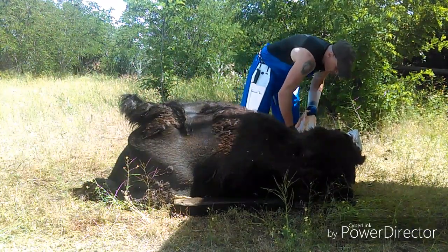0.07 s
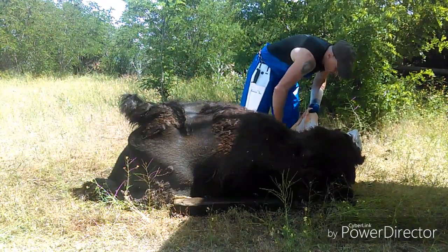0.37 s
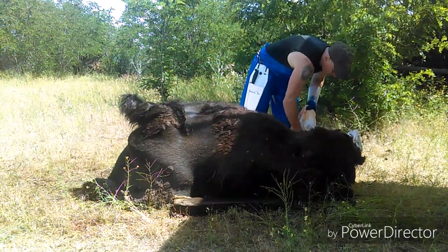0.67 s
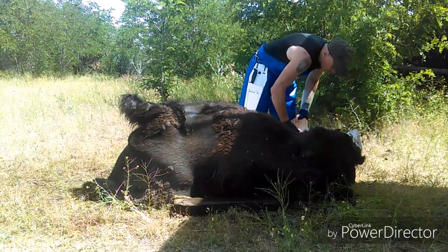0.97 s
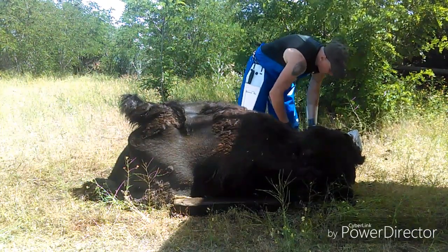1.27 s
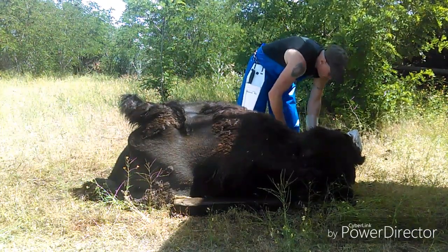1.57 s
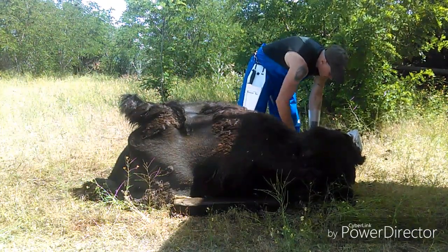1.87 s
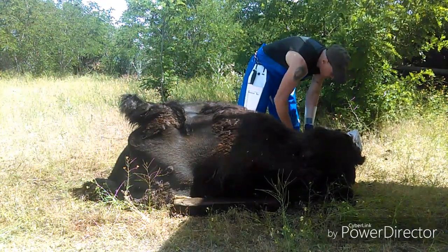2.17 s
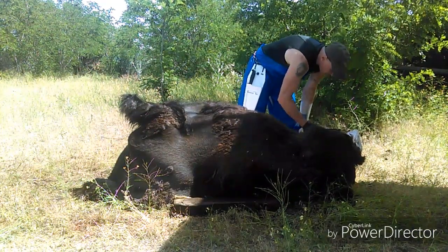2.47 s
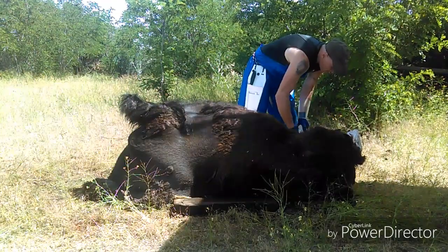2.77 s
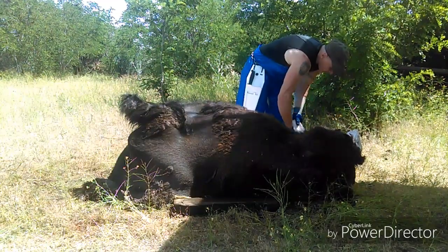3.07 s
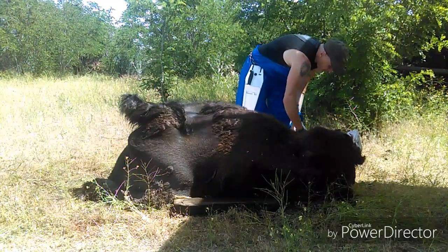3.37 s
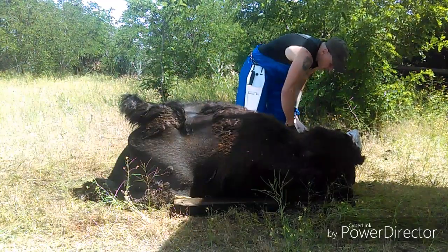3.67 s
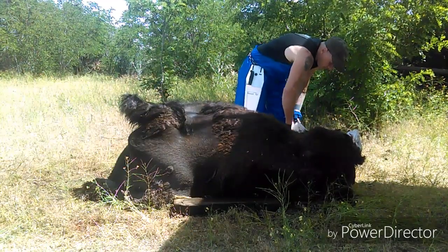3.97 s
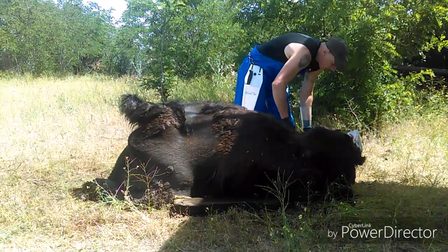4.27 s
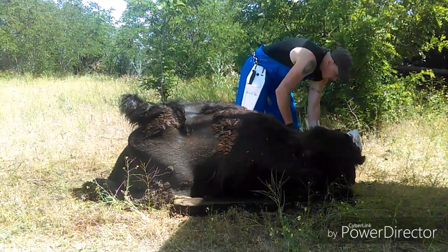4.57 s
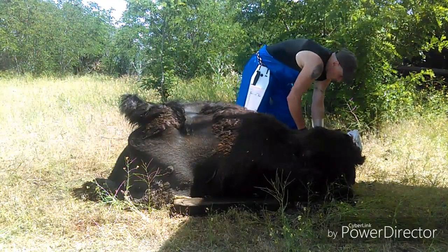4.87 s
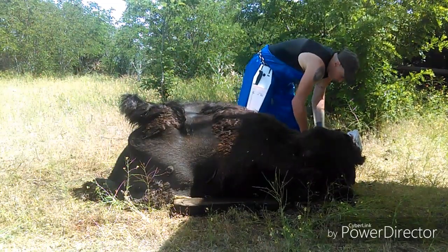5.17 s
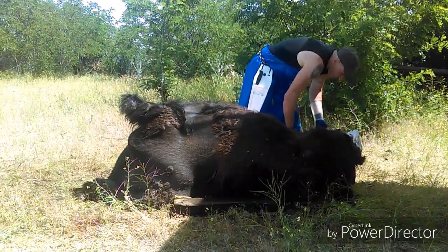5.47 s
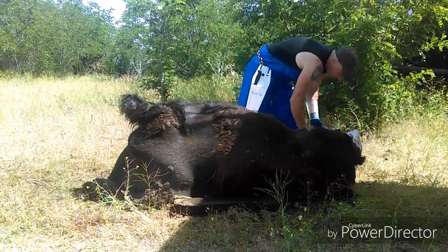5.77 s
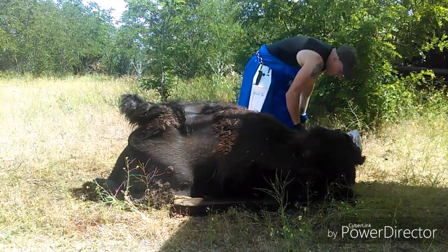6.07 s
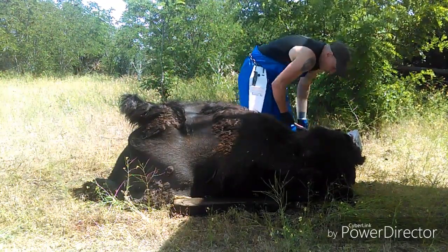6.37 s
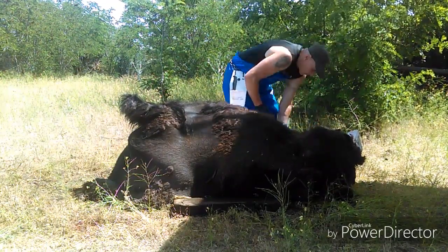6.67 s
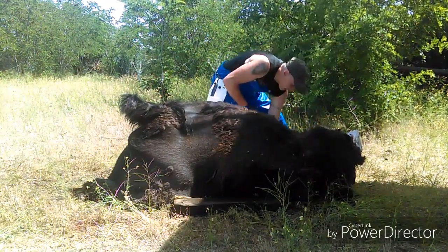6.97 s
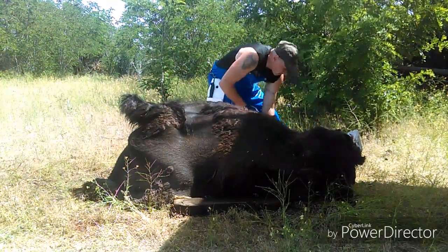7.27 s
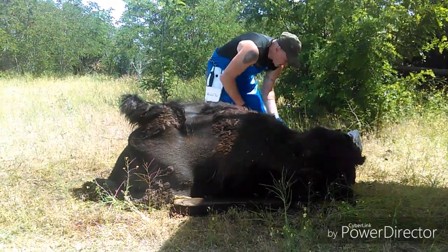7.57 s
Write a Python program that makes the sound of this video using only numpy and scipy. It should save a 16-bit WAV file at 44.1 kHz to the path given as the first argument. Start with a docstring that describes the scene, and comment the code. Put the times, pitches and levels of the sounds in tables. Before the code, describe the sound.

In a quiet field, a knife works on an animal hide a few metres away, making soft, short scrapes and small snaps with pauses between. A distant engine drones low under faint hiss. Wind builds into uneven rumbles and thumps on the microphone, mostly on the right and louder than the cutting. Late on come two faint bird chips, a slight shuffle in dry grass and a few tiny steel clinks.

```python
"""An animal hide snaps under a knife a few metres from the microphone, in a quiet field where far engines drone
under faint hiss. Short strokes drag the hide, part its fibres and hiss along the blade. Gusts buffet the two
microphone ports, the right one most. Late on, a far bird chips twice, feet shuffle in dry grass, and steel
clinks lightly as the grip changes."""
import sys
import numpy as np
from scipy import signal
from scipy.fft import rfft, irfft, next_fast_len
from scipy.io import wavfile
from scipy.ndimage import uniform_filter1d, map_coordinates

SR = 44100
rng = np.random.default_rng(int(sys.argv[2]) if len(sys.argv) > 2 else 0)


def master(y):
    """Save y as 16-bit WAV."""
    cut = np.clip(np.atleast_2d(y).T, -1, 1)
    pcm = np.round(cut * 32767)  # scale
    wavfile.write(sys.argv[1], SR, pcm.astype(np.int16))


N = 344421
TIME = np.arange(N) / SR
LEFT, RIGHT = 0, 1

# hum of the far engines: pitch_hz, rms_db
ENGINE_HUM = [(70.4, -56.5), (149, -63), (222, -64)]
# their exhaust roar: frequency_hz, density_db
EXHAUST_SPECTRUM = [(25, -100), (45, -73.5), (66, -76.5), (100, -79.5), (160, -73.5), (195, -88.5),
                    (224, -78), (265, -91), (320, -96.5), (750, -106), (1300, -120)]
# the early swell of their bass: time_s, gain_db
BASS_SWELL = [(0.1, -4.5), (1.1, 1.5)]
# still air and microphone hiss: frequency_hz, left_density_db, right_density_db
HISS_SPECTRUM = [(122, -87.5, -77.5), (397, -102, -102), (780, -105, -102), (1310, -107, -104),
                 (1680, -111, -105), (2500, -108, -104), (4600, -114, -108), (10900, -114, -110),
                 (15900, -119, -114)]
# snaps of the hide; a sharp one has more fibre and less hide:
# start_s, level_db, sharpness_db, decay_s, low_hollow_hz, high_hollow_hz
HIDE_SNAPS = [(0.045, -59, -3, 0.012, 1020, 2480), (1.586, -65.5, -1, .0028, 710, 1540),
              (2.4126, -56.5, 4, 0.0051, 2000, 2520), (3.206, -64, -4, .006, 1000, 2500),
              (3.216, -55.5, -4, 0.0062, 1330, 3050), (5.519, -69, -6.5, 0.011, 990, 3300),
              (5.891, -60, -2.5, .004, 1100, 2520), (5.906, -57.5, 3.5, 0.006, 1650, 2770),
              (6.834, -63, -1, 0.0071, 610, 2130), (6.904, -60, -4, 0.0035, 1600, 2100),
              (7.219, -68, -6, .005, 670, 1640), (7.522, -69, -3, .014, 1300, 2600)]
# knife strokes; a keen one has less drag and more hiss:
# peak_s, length_s, level_db, keenness_db, low_hollow_hz, high_hollow_hz
KNIFE_STROKES = [(0.406, 0.046, -60, -3.5, 846, 2650), (0.885, 0.04, -68.5, -3, 730, 2730),
                 (0.915, 0.043, -65.5, 3, 950, 3350), (2.37, 0.031, -68.5, -1.5, 1750, 2660),
                 (2.426, 0.034, -66.5, 0, 830, 2050), (3.168, 0.095, -73, -0.5, 910, 2900),
                 (3.232, 0.047, -64.5, -0.5, 1400, 3040), (3.689, 0.061, -63.5, 0.5, 1500, 3080),
                 (4.042, 0.032, -69.5, 0, 1300, 2930), (4.091, 0.036, -67.5, 0.5, 820, 2180),
                 (5.538, 0.068, -72.5, 7.5, 1100, 3300), (5.928, 0.067, -71, 7, 940, 2200),
                 (5.984, 0.05, -65.5, 2.5, 770, 3180), (6.917, 0.13, -74, -6.5, 560, 1320)]
# dull rustle of dragged hide, also used for grass: frequency_hz, relative_db
RUSTLE_SPECTRUM = [(250, -27), (450, -2.5), (650, 0.5), (1050, -2.5), (1900, -10), (3000, -15.5),
                   (6000, -32.5)]
# parting fibres: frequency_hz, relative_db
FIBRE_SPECTRUM = [(500, -33), (1300, 5.5), (1850, 6), (2400, 14), (3100, 6), (4000, 2), (6000, -3),
                  (12000, -8)]
# hiss along the blade: frequency_hz, relative_db
BLADE_SPECTRUM = [(1500, 1.5), (3500, 8), (7500, 5), (10000, 6.5), (10600, 13), (11300, 5), (12600, 10),
                  (15500, -14)]
# the breeze between gusts: time_s, level_db
BREEZE_LEVELS = [(0.0, -76), (1.26, -59), (1.59, -50), (1.78, -56.5), (2.52, -48.5), (2.98, -42.5),
                 (4.39, -52.5), (5.05, -42.5), (5.41, -50), (6.39, -53), (7.48, -44.5), (7.81, -60.5)]
# gusts at the microphone: peak_s, level_db, left_minus_right_db
WIND_GUSTS = [(2.995, -30.5, 2), (3.115, -28.5, -9.5), (3.385, -32, -21), (4.66, -35.5, 1.5),
              (4.96, -34, 21), (5.03, -31, -5.5), (5.098, -26.5, -26), (6.885, -34.5, 24), (6.975, -35, 2),
              (7.296, -22, -19), (7.42, -22.5, -16), (7.54, -31, 1.5), (7.66, -34, 0.5)]
# wind rumble on a port: frequency_hz, relative_db
RUMBLE_SPECTRUM = [(15, -25.5), (28, -7), (41, 4), (100, 2), (140, -6.5), (200, -15.5), (280, -53),
                   (400, -37), (550, -51), (900, -89)]
# single eddies that thump a port: peak_s, peak_db, pitch_hz, port
EDDIES = [(1.467, -24.5, 63.6, RIGHT), (2.173, -28, 102, RIGHT), (2.607, -29, 108, LEFT),
          (2.692, -23, 96, RIGHT), (2.794, -20, 69, RIGHT), (2.888, -31, 378, RIGHT),
          (2.883, -24, 113, RIGHT), (2.985, -22, 111, LEFT), (3.073, -23, 87, RIGHT), (3.1, -23, 99, RIGHT),
          (3.128, -28, 229, RIGHT), (3.262, -27.5, 208, RIGHT), (3.345, -19, 120, RIGHT),
          (3.388, -30, 97, LEFT), (3.468, -25.5, 109, RIGHT), (3.667, -28.5, 100, LEFT),
          (3.675, -24.5, 71, RIGHT), (3.91, -26, 70, LEFT), (4.107, -29.5, 81, RIGHT),
          (4.645, -22, 75, RIGHT), (4.939, -24, 121, LEFT), (4.977, -26, 144, LEFT),
          (5.017, -21.5, 130, RIGHT), (5.099, -16, 97, RIGHT), (5.691, -24.5, 91, LEFT),
          (5.863, -22.5, 111, RIGHT), (7.255, -21.5, 82, RIGHT), (7.317, -12.5, 91, RIGHT),
          (7.319, -26.5, 307, RIGHT), (7.404, -18, 65.6, RIGHT), (7.486, -37, 320, RIGHT)]
# chips of the far bird: peak_s, level_db, pitch_hz
BIRD_CHIPS = [(6.195, -70.5, 4450), (6.475, -72.5, 3870)]
# feet in the grass: peak_s, length_s, level_db
FOOT_SHUFFLES = [(6.4, 0.051, -72)]
# the four modes of the steel: pitch_hz
STEEL_MODES = [7540, 7900, 11620, 12480]
# light touches on steel, damped by the grip: start_s, t60_s, then level_db for each mode
STEEL_TOUCHES = [(6.838, 0.1, -84, -73, -62, -70), (6.966, 0.12, -65, -80, -82, -64),
                 (7.522, 0.13, -70, -73, -59, -73), (7.625, 0.054, -86, -86, -80, -61)]

STRONG_GUST_DB = -29   # reference for gust length and eddy break-up
FIBRE_PAN_DB = -4.5


def from_db(db):
    """Decibels to gain."""
    return 10 ** (np.asarray(db) / 20)


def pan(pan_db):
    """Gains of the two channels; pan_db is left minus right."""
    return from_db([[pan_db / 2], [-pan_db / 2]])


def around(time_s, reach_s):
    """The samples within reach_s of a moment."""
    return slice(max(int((time_s - reach_s) * SR), 0), int((time_s + reach_s) * SR))


def rms_one(x):
    """Scale to an rms of 1."""
    return x / np.sqrt(np.mean(x ** 2) + 1e-20)


def evened(x, seconds):
    """Hold the short-term level of a noise at 1."""
    power = uniform_filter1d(x ** 2, int(seconds * SR))
    return x / np.sqrt(uniform_filter1d(power, int(seconds * SR / 2)) + 1e-9)


def lowpass(x, order, hz):
    """Roll off the sound above hz."""
    return signal.sosfilt(signal.butter(order, hz, fs=SR, output="sos"), x)


def noise(spectrum):
    """Noise shaped by rows of frequency_hz, density_db."""
    hz, density_db = np.transpose(spectrum)
    size = next_fast_len(N)
    bins_hz = np.maximum(np.fft.rfftfreq(size, 1 / SR), 1)
    gain = from_db(np.interp(np.log(bins_hz), np.log(hz), density_db)) * np.sqrt(SR / 2)
    return irfft(rfft(rng.standard_normal(size)) * gain, size)[:N]


def drift(rate_hz):
    """A smooth random wander of rms 1 that turns about rate_hz times a second."""
    pole = np.exp(-80 * np.pi * rate_hz / SR)
    draws = rng.standard_normal(N // 40 + 2002)
    slow = signal.lfilter([1], [1, -2 * pole, pole * pole], draws)[2000:]
    return np.interp(np.arange(N) / 40, np.arange(len(slow)), rms_one(slow))


def stereo(spectrum, alike, pan_db):
    """Panned noise whose two channels share the fraction alike of their power."""
    shared = np.sqrt(alike) * noise(spectrum)
    pair = np.array([shared + np.sqrt(1 - alike) * noise(spectrum) for side in range(2)])
    return rms_one(pair) * pan(pan_db)


def ring(clicks, hz, t60_s):
    """A unit click sets a sine of height 1 ringing."""
    pole, turn = from_db(-60 / (t60_s * SR)), 2 * np.pi * hz / SR
    return signal.lfilter([0, np.sin(turn)], [1, -2 * pole * np.cos(turn), pole * pole], clicks + 1e-18)


def engine(speed_waver=0.00779, fade_db=3):
    """Exhaust roar and low hum lines of far engines that fade in and out on their way across the field."""
    running_s = np.cumsum(1 + speed_waver * drift(0.94)) / SR
    hum = np.zeros(N)
    for hz, db in ENGINE_HUM:
        level = from_db(db + fade_db * np.tanh(drift(3.3)))
        hum += level * np.sqrt(2) * np.sin(2 * np.pi * (hz * running_s + rng.random()))
    drone = hum + lowpass(noise(EXHAUST_SPECTRUM), order=2, hz=1800)   # distance takes the treble
    bass = signal.sosfiltfilt(signal.butter(4, 100, fs=SR, output="sos"), drone)
    bass_gain = from_db(np.interp(TIME, *np.transpose(BASS_SWELL)))
    return (drone + bass * (bass_gain - 1)) * pan(0.7)


def hiss():
    """Still air and the microphone's own noise, separate in each channel."""
    return np.array([noise([(hz, levels[side]) for hz, *levels in HISS_SPECTRUM]) for side in range(2)])


def hollows(textures, count, levels_db, pitches_hz, q=15, depth=1.7, flex_share=0.07, flex_hz=13):
    """Hide and fibre noise rings in pockets under the loosened hide, which flex under the hand."""
    start = int(rng.random() * (N - SR))
    tear = sum(from_db(db) * texture[:, start:start + count] for db, texture in zip(levels_db, textures))
    rings = sum(signal.lfilter(*signal.iirpeak(hz, q, fs=SR), tear) for hz in pitches_hz)
    body = tear + depth * rings
    steps, turn = np.arange(count), 2 * np.pi * flex_hz / SR
    positions = steps + flex_share / turn * np.sin(turn * steps + 2 * np.pi * rng.random())
    flexed = np.array([map_coordinates(side, [positions], order=3, mode="mirror") for side in body])
    return np.std(tear) * rms_one(flexed)


def snaps(textures, crack_db=9, crack_t60_s=0.0047, rise_s=0.00079):
    """The hide snaps: a click rings two hollows, and a short tearing tail follows."""
    out = np.zeros((2, N))
    for start_s, db, sharp_db, decay_s, low_hz, high_hz in HIDE_SNAPS:
        near = around(start_s, 0.1)
        age = TIME[near] - start_s
        click = np.diff(age >= 0, prepend=False) * from_db(db + crack_db)
        low = ring(click, low_hz, crack_t60_s) * from_db(-sharp_db) / 2
        high = ring(click, high_hz, crack_t60_s) * from_db(sharp_db)
        tail = np.exp(-np.abs(age) / np.where(age < 0, rise_s, decay_s) / 2)
        tear = hollows(textures, len(tail), [db - sharp_db, db + sharp_db], [low_hz, high_hz])
        out[:, near] += (low + high) * pan(FIBRE_PAN_DB) + tail * tear
    return out


def knife(drag_db=2.5, blade_db=-1, jerk_db=2.2, rise_share=0.48, hiss_lag_s=0.0027, steepness=1.59):
    """Each stroke drags the hide, parts fibres in jerks and hisses along the blade; the hide snaps too."""
    tearing, hiss_power = np.zeros((2, N)), np.zeros(N)
    jerks = evened(from_db(jerk_db * drift(170)), seconds=0.021)
    textures = [stereo(RUSTLE_SPECTRUM, alike=0.63, pan_db=-1.5),
                stereo(FIBRE_SPECTRUM, alike=0.1, pan_db=FIBRE_PAN_DB)]
    for peak_s, length_s, db, keen_db, low_hz, high_hz in KNIFE_STROKES:
        near = around(peak_s, 0.25)
        age = TIME[near] - peak_s - np.array([[0], [hiss_lag_s]])   # the pull leads, the blade follows
        width_s = length_s * np.where(age < 0, rise_share, 1 - rise_share)
        pull, run = np.exp(-np.abs(age / width_s) ** steepness / 2)
        tear = hollows(textures, len(pull), [db + drag_db - keen_db, db], [low_hz, high_hz])
        tearing[:, near] += pull * jerks[near] * tear
        hiss_power[near] += (run * from_db(db + blade_db + keen_db)) ** 2
    return tearing + snaps(textures) + np.sqrt(hiss_power) * stereo(BLADE_SPECTRUM, alike=0, pan_db=8)


def wind_levels(breeze_gain_db=4, windward_db=7, lull_db=-58.5, rise_s=0.042, fall_s=0.054, stretch=0.19):
    """Breeze and gusts set the rumble level at each port; the right one faces the breeze."""
    breeze_db = np.interp(TIME, *np.transpose(BREEZE_LEVELS)) + breeze_gain_db
    stirred = 1 / (1 + from_db(lull_db - breeze_db) ** 2)   # slow air barely stirs the ports
    power = (stirred * from_db(breeze_db) * pan(-windward_db)) ** 2
    for peak_s, db, pan_db in WIND_GUSTS:
        near = around(peak_s, 0.3)
        age = (TIME[near] - peak_s) / from_db(stretch * (db - STRONG_GUST_DB))   # stronger lasts longer
        swell = np.exp(-(age / np.where(age < 0, rise_s, fall_s)) ** 2)
        shares = np.array([[from_db(pan_db) ** 2], [1]]) / (1 + from_db(pan_db) ** 2)
        power[:, near] += shares * from_db(db) ** 2 * swell
    return np.sqrt(power)


def wind(level, swirl_db=-21.5, swirl_growth=2.67, lumpy_db=3.5, flutter_db=3.5):
    """Lumpy turbulent pressure on one port; strong swings break up into smaller, higher eddies."""
    lumps = from_db(lumpy_db * drift(20.6))
    flutter = from_db(flutter_db * np.tanh(drift(5.4)))
    rumble = level * flutter * evened(noise(RUMBLE_SPECTRUM) * lumps, seconds=0.044)
    swing = np.abs(signal.hilbert(rumble, next_fast_len(N))[:N]) / from_db(STRONG_GUST_DB)
    breakup = 6 * np.tanh(swing ** swirl_growth / 6)   # levels off in the hardest swings
    swirl = rms_one(noise([(120, -1.5), (210, 18), (340, -11.0), (520, -16.5), (900, -56)]))
    pressure = rumble + from_db(STRONG_GUST_DB + swirl_db) * breakup * swirl
    return lowpass(pressure, order=4, hz=700)   # the eddies are too large to make treble


def buffets(width_rad=2.88):
    """An eddy crossing a port gives a brief swing of pressure."""
    out = np.zeros((2, N))
    for peak_s, db, hz, port in EDDIES:
        near = around(peak_s, 0.1)
        phase = 2 * np.pi * hz * (TIME[near] - peak_s)
        out[port, near] += from_db(db) * np.cos(phase) * np.exp(-(phase / width_rad) ** 2 / 2)
    return out


def bird(width_s=0.013, rasp=0.069):
    """Two faint, far chips, raspy and blurred by the trees."""
    out = np.zeros((2, N))
    for peak_s, db, hz in BIRD_CHIPS:
        age = np.clip(TIME - peak_s, -0.1, 0.1)
        swell = from_db(db) * np.exp(-(age / width_s) ** 2 / 2)
        turns = np.cumsum(hz * (1 + rasp * drift(304))) / SR
        blur = 0.5 + np.array([drift(150) for side in range(2)])
        out += blur * swell * np.sqrt(2) * np.sin(2 * np.pi * turns)
    return out


def grass(rustle_db=-84, shifting_db=6):
    """Dry grass stirs faintly underfoot, more so once the stance shifts and the feet shuffle."""
    shifting = np.interp(TIME, [6.1, 6.5], [0, 1])
    patches_db = 7 * np.tanh(drift(20))
    level = from_db(rustle_db + shifting_db * shifting + patches_db)
    stirring = level * stereo(RUSTLE_SPECTRUM, alike=0.72, pan_db=0.5)
    shuffles = sum(from_db(db) * np.exp(-((TIME - peak_s) / length_s) ** 2 / 2)
                   for peak_s, length_s, db in FOOT_SHUFFLES)
    return stirring + shuffles * stereo(RUSTLE_SPECTRUM, alike=0.42, pan_db=-3)


def clinks(graze_s=0.0026):
    """Steel grazes steel; the point of contact decides which modes ring, and each chatters on its own."""
    out = np.zeros(N)
    chatters = [0.5 + drift(200) for hz in STEEL_MODES]
    for start_s, t60_s, *levels_db in STEEL_TOUCHES:
        click = np.zeros(N)
        click[int(start_s * SR)] = 1
        swell = 1 - np.exp(-np.maximum(TIME - start_s, 0) / graze_s)
        for hz, db, chatter in zip(STEEL_MODES, levels_db, chatters):
            out += swell * ring(click, hz, t60_s) * from_db(db) * chatter
    return out * pan(4)


def scene():
    """Knife work a few metres off, wind on the microphone itself, engines and bird far away."""
    floor = hiss()
    rumble = np.array([wind(level) for level in wind_levels()])
    return knife() + clinks() + grass() + bird() + engine() + floor + rumble + buffets()


def record(dry, cutoff_hz=15550):
    """The top is cut steeply."""
    return signal.sosfilt(signal.ellip(12, 0.1, 90, cutoff_hz, fs=SR, output="sos"), dry)


dry = scene()
out = record(dry)
master(out)
```